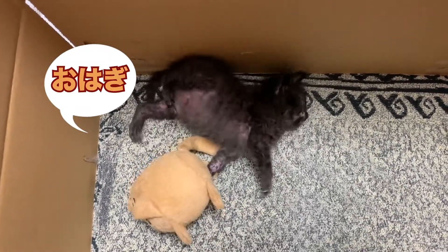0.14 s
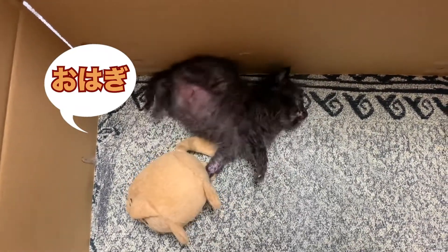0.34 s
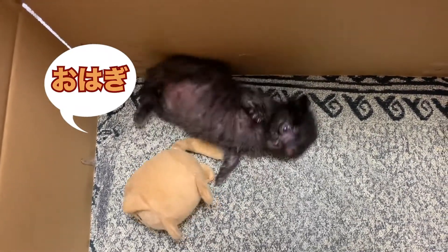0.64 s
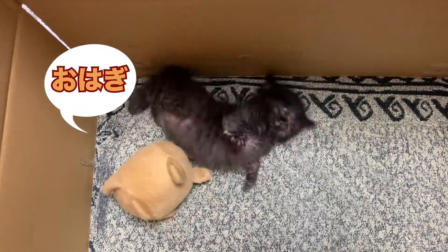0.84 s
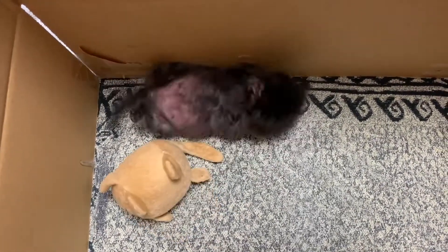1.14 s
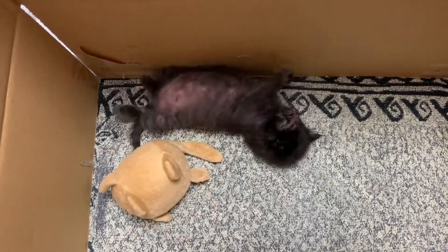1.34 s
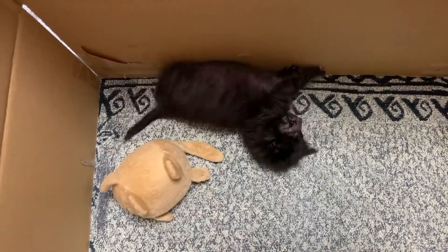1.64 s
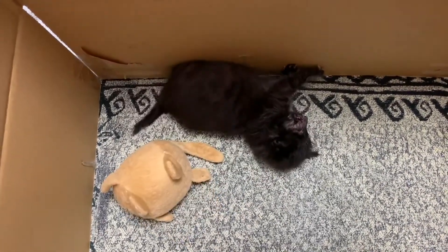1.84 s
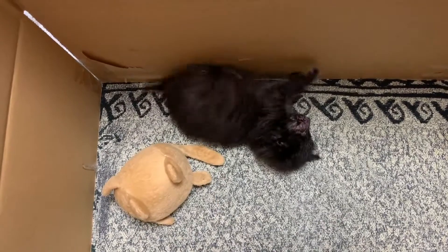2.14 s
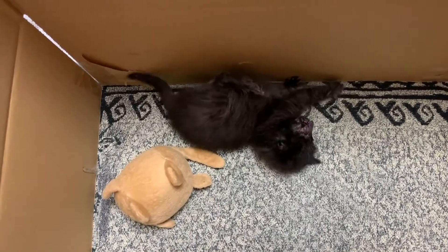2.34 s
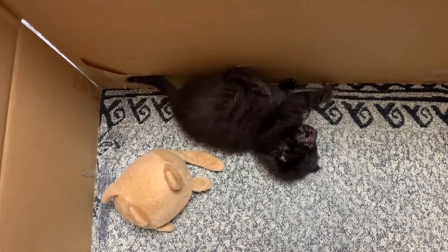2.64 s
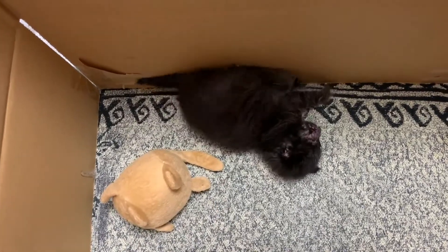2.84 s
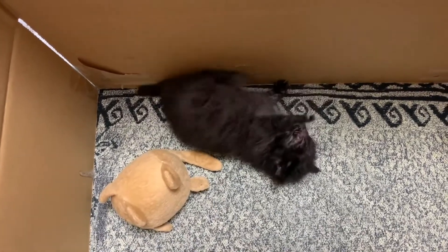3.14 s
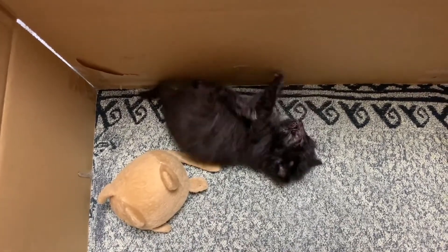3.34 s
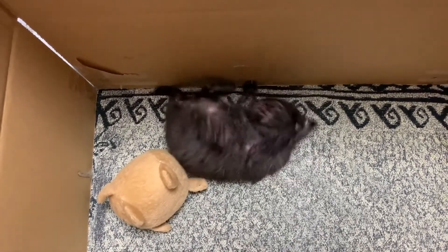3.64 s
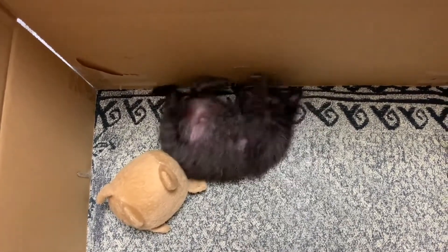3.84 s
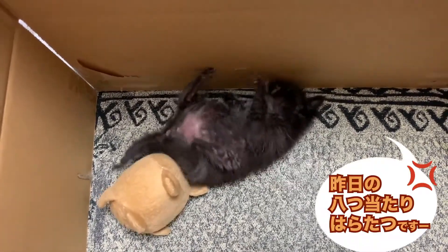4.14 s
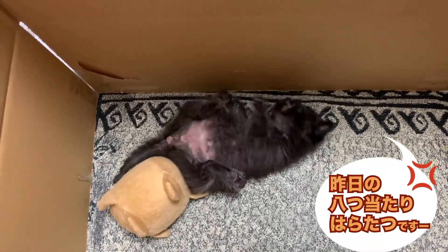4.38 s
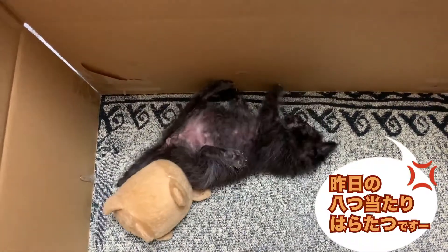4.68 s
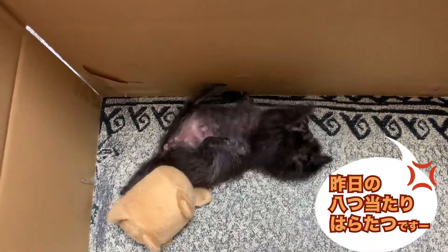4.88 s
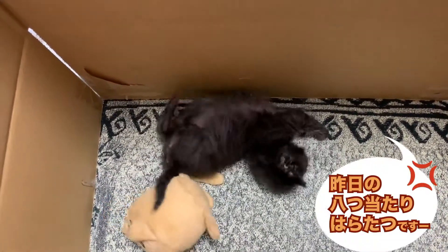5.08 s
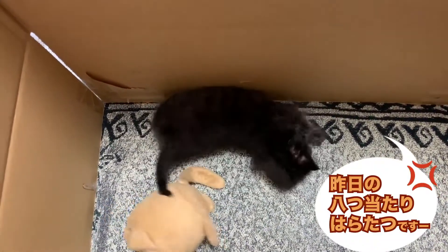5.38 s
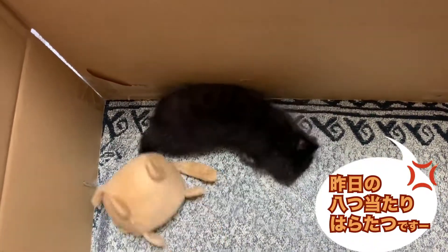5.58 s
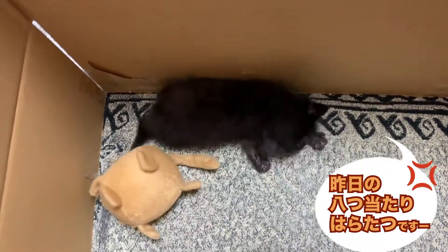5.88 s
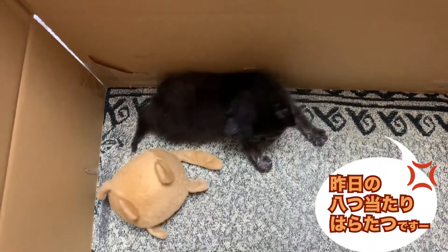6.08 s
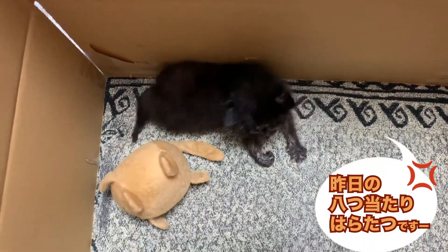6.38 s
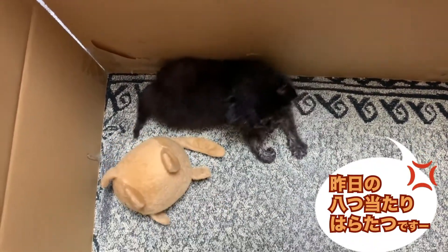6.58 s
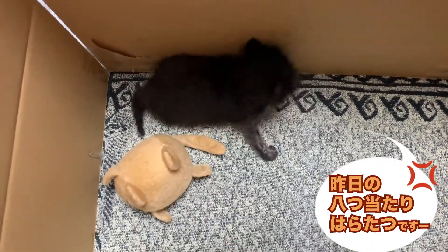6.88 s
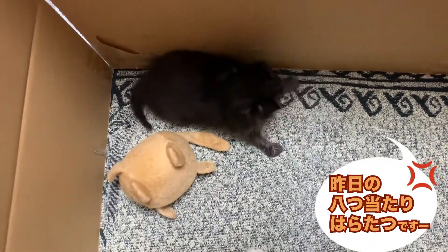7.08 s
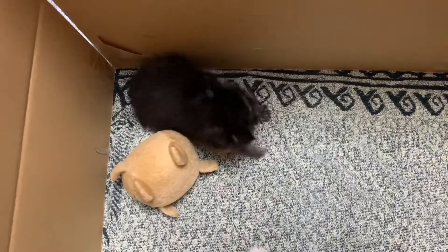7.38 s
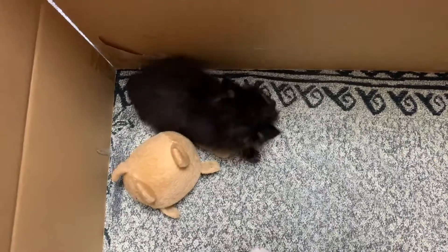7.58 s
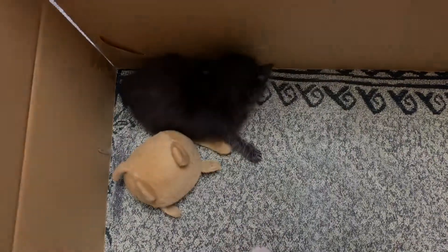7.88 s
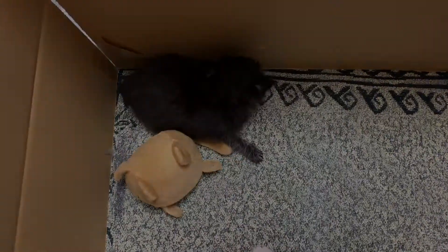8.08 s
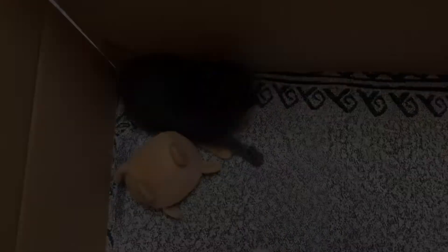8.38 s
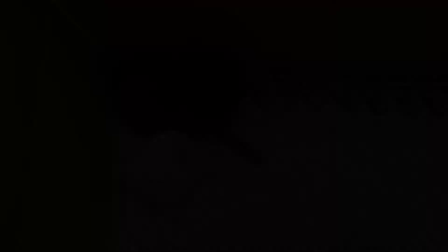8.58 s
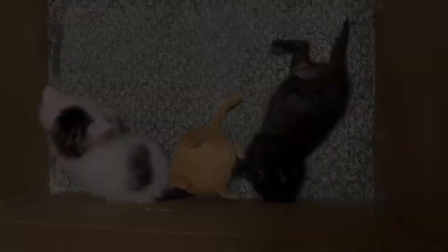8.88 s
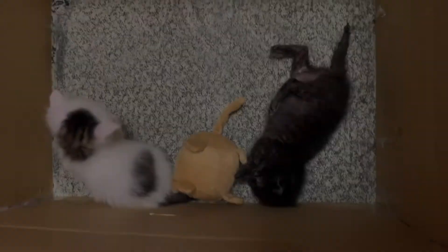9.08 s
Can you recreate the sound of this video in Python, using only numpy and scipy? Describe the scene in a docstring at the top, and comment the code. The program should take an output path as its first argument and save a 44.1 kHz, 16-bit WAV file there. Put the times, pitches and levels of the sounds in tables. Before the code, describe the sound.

Close, soft rustling and scratching come in fits as a kitten wriggles on carpet in a cardboard box. Dull knocks on the wall mix with quick paw swipes and crisp claw clicks. Past the middle, a brief hard clatter and a dull shuffle come from beside the box, and the floor thumps softly. Only light rubs and taps follow, with a low indoor hum underneath.

```python
"""A kitten rolls about on a carpet mat in a big cardboard box, heard from just above.
Its fur brushes the mat, its paws scrape and knock the cardboard and make it ring,
and its claws catch and snap free. Rubbing sounds are made of many tiny slips.
Soft thumps shake the floor, something clacks and shuffles outside the box, and the quiet room hums."""
import sys
import numpy as np
from scipy import signal
from scipy.fft import rfft, irfft
from scipy.io import wavfile
from scipy.ndimage import uniform_filter1d, map_coordinates

SR = 44100
rng = np.random.default_rng(int(sys.argv[2]) if len(sys.argv) > 2 else 0)


def dump_mix(stems):
    """Bounce the given channels to the path in sys.argv[1] as a 16-bit WAV at rate SR."""
    frames = np.atleast_2d(stems).T  # one column per channel
    limited = np.clip(frames, -1, 1)  # hard clip at full scale
    pcm = np.round(limited * 32767).astype(np.int16)
    wavfile.write(sys.argv[1], SR, pcm)


N = 406643
TIME = np.arange(N) / SR
HIT = TIME[:SR // 2]  # half a second, the clock for one short sound


def amp(db):
    """Turn decibels into a factor to multiply by."""
    return 10 ** (np.asarray(db) / 20)


def unit(x):
    """Scale a sound to an average (rms) strength of 1."""
    return x / np.sqrt(np.mean(x ** 2))


def energy(x, db, span_s=0.013):
    """Give a short sound the energy of a level held for span_s."""
    return x * amp(db) * np.sqrt(span_s * SR / np.sum(x ** 2))


def add(track, s, sound):
    """Mix a sound into the track, starting at s seconds."""
    start = int(s * SR)
    track[start:start + len(sound)] += sound[:max(N - start, 0)]


def fade(seconds):
    """A curve that dies away by 60 dB in the given time."""
    return np.exp(-np.log(1000) * HIT / max(seconds, 1e-3))


def swell(s, length):
    """Speed of a stroke around time s: it gathers pace, holds and stops short."""
    along = 2 * (TIME - s) / length
    steepness = np.where(along < 0, 1, along ** 2)
    return np.exp(-np.minimum(along ** 2 * steepness, 50))


def walk(rate):
    """A random curve that drifts about 1 either way and turns about `rate` times a second."""
    step = int(SR / rate)
    return 1.8 * uniform_filter1d(np.repeat(rng.standard_normal(N // step + 1), step), step)[:N]


def grains(share, spread_db, size):
    """Tiny slips of uneven strength, on a given share of all samples."""
    direction, strength = rng.standard_normal((2, size))
    return (rng.random(size) < share) * np.sign(direction) * amp(spread_db * np.clip(strength, -2, 2))


def cut(x, order, hz, kind):
    """Keep the lows, the highs or a band; a higher order cuts more steeply."""
    return signal.sosfilt(signal.butter(order, hz, kind, fs=SR, output="sos"), x)


def colour(x, points, size=8192):
    """Shape the tone of a sound along a curve of (Hz, dB) points."""
    hz, db = np.transpose(points)
    log_hz = np.log(np.fft.rfftfreq(size, 1 / SR) + 1)
    log_gain = np.log(amp(np.interp(log_hz, np.log(hz), db)))
    # build the filter so that nothing sounds before its cause
    cepstrum = irfft(log_gain)[:size // 2]
    cepstrum[1:] *= 2
    response = irfft(np.exp(rfft(cepstrum, size)))
    return signal.fftconvolve(x, response)[:len(x)]


def ring(x, modes, scatter_db=0):
    """Make an object ring at its own notes (modes); a wider note dies sooner."""
    shares = amp(scatter_db * rng.standard_normal(len(modes)))  # vary with the spot touched
    response = sum(share * amp(db) * width * np.exp(-np.pi * width * HIT) * np.sin(2 * np.pi * hz * HIT)
                   for share, (hz, width, db) in zip(shares, modes))
    return signal.fftconvolve(x, response * 2 * np.pi / SR)[:len(x)]


def room_hum(level_db=-51, waver_db=0.9):
    """The house rumbles alike on both sides, under a faint hiss that differs left and right."""
    # Each row: frequency in Hz, relative level in dB.
    room_tone = [(20, -12.5), (40, 0.5), (70, -3), (96, 4), (125, -4.5), (200, -16), (320, -18), (520, -23),
                 (760, -37.5), (1500, -33.5), (4000, -46.5), (8000, -41.5), (16000, -59.5)]
    rumble, hiss = (unit(colour(rng.standard_normal(N), room_tone)) for _ in range(2))
    hiss = cut(hiss, 1, 2000, "highpass")
    return amp(level_db) * (rumble * amp(waver_db * walk(1.8)) + np.array([hiss, -hiss]))


def wriggling(rise_s=0.04, settle_s=0.04, twitch_db=2.3, twitches_per_s=26):
    """How hard the body rubs mat and wall: each bout sets in, twitches and dies away."""
    # Each row: start and end in seconds, relative level on the mat and on the wall in dB.
    bouts = [(0.083, 0.177, -68, -66.5), (0.453, 0.874, -73, -69.5), (1.091, 1.312, -61, -61),
             (1.49, 1.733, -59.5, -54), (1.8, 2, -69, -66.5), (2.01, 2.274, -58.5, -61),
             (2.32, 2.703, -74.5, -66.5), (2.787, 3.138, -74, -62), (3.452, 3.61, -64, -62),
             (3.697, 4.155, -65, -61), (4.558, 5.087, -65, -59.5), (5.181, 5.487, -65.5, -61.5),
             (6.282, 6.414, -71, -62.5), (6.834, 7.12, -60.5, -61), (8.405, 8.646, -72.5, -71.5)]
    effort = np.zeros((2, N))
    for start, end, mat_db, wall_db in bouts:
        rest = np.maximum((start - TIME) / rise_s, (TIME - end) / settle_s)
        moving = np.exp(-np.clip(rest, 0, 20))
        effort = np.maximum(effort, np.outer(amp([mat_db, wall_db]), moving))
    return effort * amp(twitch_db * walk(twitches_per_s))


def swiping(effort):
    """Add quick paw swipes to the wriggling, giving the rubbing speed on mat and cardboard."""
    # Each row: middle and length in seconds, relative level on the mat and on the cardboard in dB.
    swipes = [(1.577, 0.061, -50, -36), (1.766, 0.069, -42.5, -50), (1.802, 0.047, -49.5, -39.5),
              (1.891, 0.039, -57, -36.5), (2.057, 0.081, -47, -36), (2.142, 0.12, -56.5, -40.5),
              (2.949, 0.15, -58.5, -57), (3.125, 0.11, -55.5, -56.5), (3.402, 0.044, -49, -46),
              (3.572, 0.081, -54.5, -63), (3.69, 0.028, -49.5, -63), (3.959, 0.071, -34, -54),
              (4.099, 0.074, -39.5, -40.5), (4.197, 0.044, -48.5, -57), (4.717, 0.026, -42, -35),
              (4.771, 0.031, -46, -53.5), (4.818, 0.095, -52.5, -52), (5.022, 0.13, -48.5, -80),
              (5.329, 0.041, -49.5, -61), (7.252, 0.11, -56.5, -57), (7.887, 0.075, -64.5, -64),
              (8.039, 0.075, -69.5, -66), (8.24, 0.05, -69, -66.5), (8.484, 0.04, -65, -54.5)]
    power = effort ** 2
    for s, length, mat_db, card_db in swipes:
        power += np.outer(amp([mat_db, card_db]), swell(s, length)) ** 2
    return np.sqrt(power)


def roaming(x, patchy_db, spots_per_s=14):
    """A paw moves from spot to spot, so each narrow band of pitch swells and sinks on its own."""
    hz, s, cells = signal.stft(x, SR, nperseg=512)
    spots = rng.standard_normal((64, 512))
    place = np.meshgrid(6 * np.log2(1 + hz / 200), s * spots_per_s, indexing="ij")
    gain = amp(patchy_db * map_coordinates(spots, place, order=1, mode="mirror"))
    return signal.istft(cells * gain, SR)[1][:N]


def brushing(speed, mat_db=6.5, fur_db=-12.5, flutter_db=2):
    """Countless carpet fibres flick past, and fine hairs whisper along with them."""
    # Each row, in both tables: frequency in Hz, relative level in dB.
    mat_tone = [(100, -18.5), (400, -12.5), (800, -24), (1500, -13.5), (3500, -2.5), (5300, -4), (6700, 6),
                (8500, 1.5), (10500, 0), (14000, -12.5), (16000, -23.5)]
    fur_tone = [(5000, -36.5), (11000, -16), (13300, 2.5), (16000, 0), (17000, -30)]
    hiss = colour(grains(.05, 5, N), mat_tone) * amp(flutter_db * walk(60))
    mat = unit(roaming(hiss, patchy_db=3.4)) * speed * amp(mat_db)
    touch = speed ** .75  # hairs sound at the lightest touch and grow less with force
    fur = unit(colour(rng.standard_normal(N), fur_tone)) * touch * amp(fur_db)
    return mat + fur


def wander(x, depth=0.06, rate=9):
    """The pitch drifts up and down as a paw moves along the wall."""
    position = np.arange(N) + np.cumsum(depth * walk(rate))
    return map_coordinates(x, [position], order=1, mode="mirror")


def cardboard(x, scatter_db=0, stretch=1):
    """A small touch rings the cardboard with little bass; stretch scales its pitch."""
    # Each row: pitch in Hz, width in Hz, relative level in dB.
    high_modes = [(940, 70, -11), (1165, 55, 2), (1340, 70, 2), (1625, 75, 2), (1795, 80, -2),
                  (1960, 150, -4), (2350, 130, -6), (2530, 110, -8), (2890, 200, -11), (3400, 400, -11.5),
                  (3950, 500, -16)]
    modes = [(hz * stretch, width, db) for hz, width, db in high_modes]
    return cut(ring(x, modes, scatter_db), 4, 1080, "highpass")


def dragging(speed, rub_db=-4, ring_db=-8, hollow_db=-2, judder_db=2):
    """Paw pads stick and slip: a dry rub, the ring of the cardboard and the hollow box."""
    # Each row: frequency in Hz, relative level in dB.
    rub_tone = [(100, -9.5), (330, 10.5), (570, 6.5), (740, -1), (1000, -12), (1300, 2), (2200, -3),
                (3000, -15.5), (4200, -3.5), (8000, -29), (16000, -52.5)]
    # The hollow notes of the box. Each row: pitch in Hz, width in Hz, relative level in dB.
    box_modes = [(400, 180, -3), (574, 60, 3), (865, 110, -9), (1170, 60, 2), (1980, 250, -5)]
    slips = grains(.05, 4.5, N) * amp(judder_db * walk(90))
    hollow = amp(hollow_db) * unit(cut(wander(ring(slips, box_modes)), 2, 300, "highpass"))
    rub = amp(rub_db) * unit(colour(slips, rub_tone))
    ringing = amp(ring_db) * unit(cardboard(slips))
    return roaming(rub + ringing + hollow, patchy_db=4) * speed


def snagging(speed, hz, db, octaves=0.5, cycles=14, spread_db=4, count=3500):
    """Single fibres snag on a claw and flick free, each with its own pitch and strength."""
    out = np.zeros(N)
    starts = rng.uniform(0, TIME[-1], count)
    chances = np.clip(rng.standard_normal((count, 2)), -2, 2)
    for s, (pitch, size) in zip(starts, chances):
        turns = hz * 2 ** (octaves * pitch) * HIT[:512]
        decay = np.exp(-np.log(1000) * turns / cycles)
        add(out, s, amp(spread_db * size) * np.sin(2 * np.pi * turns) * decay)
    return unit(out) * speed * amp(db)


def zipping():
    """A claw runs over the threads of the mat with a pitched rasp."""
    # Each row: middle and length in seconds, relative level in dB, pitch and width in Hz.
    zips = [(0.427, 0.03, -58.5, 920, 200), (1.777, 0.03, -35.5, 4280, 1500),
            (3.683, 0.049, -40, 4400, 1415), (3.954, 0.15, -46.5, 3460, 800),
            (4.709, 0.032, -32.5, 3800, 1200), (5.327, 0.035, -44, 8050, 400),
            (5.682, 0.023, -37, 4650, 600), (8.923, 0.37, -68, 990, 160)]
    out = np.zeros(N)
    for s, length, db, hz, width in zips:
        rasp = unit(ring(grains(0.032, 1.9, len(HIT)), [(hz, width, 0)]))
        speed = np.exp(-(2 * (HIT - HIT.mean()) / length) ** 2)
        add(out, s - HIT.mean(), rasp * speed * amp(db))
    return out


def blows(rows, modes, boost_db, chatter, chatter_s):
    """Padded pushes ring a surface, each with a faint chatter as the body settles."""
    out = np.zeros(N)
    for s, db, hz in rows:
        force = chatter * unit(grains(.05, 3.0, len(HIT))) * fade(chatter_s)
        force[0] += 1  # the push itself
        padded = cut(force, 1, [hz / 1.4, hz * 1.35], "bandpass")
        blow = ring(padded, modes)
        add(out, s, blow * amp(db + boost_db) / np.abs(blow).max())
    return out


def bending(x, lag_s, at_hz=100, lead_hz=4000):
    """High waves cross cardboard faster, so a blow sinks in pitch; at_hz takes about lag_s."""
    hz = np.fft.rfftfreq(2 * N, 1 / SR)
    turns = lag_s * np.sqrt(at_hz) * (2 * np.sqrt(hz) - hz / np.sqrt(lead_hz))
    return irfft(rfft(x, 2 * N) * np.exp(-2j * np.pi * turns))[:N]


def knocking(follow_s=0.0215, follow_db=-14, follow_pitch=0.6, pad_hz=900):
    """Soft blows run through the wall; the body follows each one, later, softer and lower."""
    # Each row: start in seconds, relative level in dB, middle frequency of the push in Hz.
    knocks = [(1.1225, -22.5, 180), (1.184, -26, 297), (2.223, -22.5, 212), (3.04, -34.5, 143),
              (3.372, -22.5, 607), (3.386, -33.5, 149), (4.693, -16.5, 348), (4.726, -31.5, 300),
              (4.799, -37.5, 277), (5.681, -41, 260), (5.773, -44, 200), (6.013, -35, 232),
              (6.815, -32.5, 404), (6.838, -32, 228), (7.854, -34, 380), (9.202, -31, 150)]
    # The notes of the bending wall. Each row: pitch in Hz, width in Hz, relative level in dB.
    wall_modes = [(122, 26, -4), (183, 30, -1), (290, 30, -4), (320, 380, 0), (400, 80, -7), (560, 60, -2)]
    follows = [(s + follow_s, db + follow_db, hz * follow_pitch) for s, db, hz in knocks]
    wall = blows(knocks + follows, wall_modes, boost_db=7.5, chatter=0.039, chatter_s=0.11)
    return bending(cut(wall, 2, pad_hz, "lowpass"), lag_s=0.012)


def ticking(boost_db=2, fade_s=0.018, breadth=0.3, upper_db=-8):
    """A claw tip taps and skips on a small patch of cardboard that barely rings."""
    # Each row: start in seconds, relative level in dB, pitch of the spot in Hz.
    ticks = [(1.1235, -51, 1270), (2.382, -56.5, 1930), (2.514, -56.5, 2500), (2.558, -48.5, 3050),
             (2.93, -52.5, 7500), (4.564, -60, 3400), (4.855, -43, 7000), (5.077, -47.5, 7500),
             (8.408, -53.5, 450), (8.852, -63, 1310)]
    out = np.zeros(N)
    for s, db, hz in ticks:
        slips = grains(.25, 4, len(HIT)) * fade(fade_s)
        slips[0] += 2  # the first tap
        modes = [(hz, hz * breadth, 0), (hz * 1.3, hz * breadth, upper_db)]
        add(out, s, energy(ring(slips, modes), db + boost_db))
    return out


def clawing(ring_boost_db=5, snap_boost_db=3.5, lead_in_db=-25, lead_in_s=0.032):
    """A faint hiss swells just before each claw snaps, then a short run of smaller slips follows."""
    # Each row: time in seconds, relative level of the ring and of the snap in dB, fade in seconds.
    claws = [(1.1804, -24, -26.5, 0.027), (1.551, -45, -38.5, 0.1), (2.224, -39.5, -47.5, 0.0094),
             (2.2633, -58, -44, 0.024), (3.046, -54.5, -68, 0.009), (3.372, -34, -35.5, 0.06),
             (4.073, -45, -37, 0.051), (4.49, -47, -52.5, 0.064), (4.564, -60.5, -50, 0.056),
             (4.6932, -31.5, -30, 0.11), (5.397, -53.5, -42.5, 0.064), (5.526, -52, -45, 0.12),
             (5.678, -49, -30, 0.014), (5.9693, -58, -39.5, 0.0071), (6.013, -31, -26, 0.017),
             (6.128, -51.5, -40, 0.021), (6.817, -55.5, -38.5, 0.064), (6.907, -50, -40.5, 0.12),
             (7.8526, -49.5, -39, 0.032)]
    # Each row: frequency in Hz, relative level in dB.
    snap_tone = [(300, -30.5), (1000, -10), (2200, 1), (4500, 9), (7500, 8), (10500, 2), (14500, -2)]
    out = np.zeros(N)
    for s, ring_db, snap_db, fade_s in claws:
        loudness = np.concatenate([amp(lead_in_db) * fade(lead_in_s)[::-1], fade(fade_s)])
        slips = grains(0.28, 8.0, len(loudness)) * loudness
        slips[len(HIT)] += 1.4  # the snap itself
        ringing = cardboard(slips, scatter_db=1.8, stretch=1 + .015 * rng.standard_normal())
        snap = energy(colour(slips, snap_tone), snap_db + snap_boost_db)
        add(out, s - len(HIT) / SR, energy(ringing, ring_db + ring_boost_db) + snap)
    return bending(out, lag_s=0.004)


def thumping():
    """Weight lands and shakes the floor under the box."""
    # Each row: start in seconds, relative level in dB, middle frequency of the push in Hz.
    landings = [(1.184, -31.5, 112.3), (2.85, -35, 85), (2.94, -34, 61), (3.385, -40, 35.6),
                (4.699, -38.5, 55), (5.38, -40, 42.6), (6.902, -20, 48.7), (7.855, -41, 50.3)]
    # The deep notes of the floor. Each row: pitch in Hz, width in Hz, relative level in dB.
    floor_modes = [(27.23, 2.7, 12), (53, 7, -10.5), (66, 17, -1.5), (104.6, 4.8, -8), (160, 38, -13)]
    return blows(landings, floor_modes, boost_db=7, chatter=0.012, chatter_s=0.67)


def shuffling(level_db=-1, scuff_db=2):
    """Something slides outside the box in dull, uneven strokes; the last, at 7.29 s, is the kitten's body
    rolling over."""
    # Each row: middle and length in seconds, relative level in dB.
    shuffles = [(6.446, 0.4, -50.5), (6.705, 0.16, -42), (6.91, 0.068, -41), (7.291, 0.37, -54)]
    # Each row: frequency in Hz, relative level in dB.
    shuffle_tone = [(60, 5), (150, 2), (300, 6.5), (550, -3.5), (950, -8.5), (1400, -10), (2200, -15.5),
                    (5000, -15), (12000, -30)]
    speed = sum(amp(db) * swell(s, length) for s, length, db in shuffles)
    rub = unit(colour(grains(.05, 4.3, N), shuffle_tone))
    return rub * speed * amp(level_db + scuff_db * walk(35))


def clacking(level_db=-10, fade_s=0.027, breadth=0.34, upper_db=-5):
    """Something hard clacks outside the box: a brief rattle rings two notes and a bright crack."""
    # Each row: start in seconds, relative level in dB, lower and upper note in Hz.
    clacks = [(6.355, -27.5, 1250, 1720), (6.412, -24, 1210, 2640), (6.418, -26.5, 1160, 1710),
              (6.428, -34.5, 1120, 1700), (6.451, -18, 900, 2270), (6.467, -22.5, 1670, 3550),
              (6.602, -30.5, 920, 3000)]
    # The crack all clacks share. Each row: pitch in Hz, width in Hz, relative level in dB.
    crack_modes = [(4000, 5100, -14.5), (7290, 3300, -12.5), (14000, 1620, -35)]
    out = np.zeros(N)
    for s, db, low_hz, high_hz in clacks:
        rattle = grains(.4, 2.9, len(HIT)) * fade(fade_s)
        notes = [(low_hz, low_hz * breadth, 0), (high_hz, high_hz * breadth, upper_db)]
        clack = cut(ring(rattle, notes + crack_modes), 2, low_hz / 2, "highpass")
        add(out, s, energy(clack, db + level_db))
    return out


def reverb(x, db, fade_s, dull_hz):
    """Many echoes blur into a tail whose bass is alike left and right."""
    common, apart = rng.standard_normal((2, len(HIT)))
    apart = cut(apart, 2, 350, "highpass")
    onset = 1 - np.exp(-HIT / 0.0005)
    tails = np.array([common + apart, common - apart]) * fade(fade_s) * onset
    tails = cut(tails, 1, dull_hz, "lowpass")
    return amp(db) * np.array([signal.fftconvolve(x, tail / np.linalg.norm(tail))[:N] for tail in tails])


def stereo(x):
    """Sound reaches the two openings of the microphone out of step."""
    # Each row: frequency in Hz, lead of the left side over the right in radians.
    leads = [(0, 0), (560, .15), (760, 1.7), (1100, .35), (2400, .4), (3900, 1.2), (5300, 3.1),
             (14200, 12.2)]
    lead = np.interp(np.fft.rfftfreq(2 * N, 1 / SR), *np.transpose(leads))
    return irfft(rfft(x, 2 * N) * np.exp(.5j * np.array([lead, -lead])))[:, :N]


def scene():
    """The kitten in its box, the noises beside it and the room around both."""
    on_mat, on_card = swiping(wriggling())
    thumps = thumping()
    snags = snagging(on_mat, hz=4000, db=-6) + snagging(on_card, hz=2200, db=-5)
    scratches = brushing(on_mat) + dragging(on_card) + snags + zipping() + clawing() + ticking()
    kitten = scratches + knocking()
    outside = shuffling() + clacking()
    box_echo = reverb(scratches, db=-10, fade_s=0.067, dull_hz=4670)
    room_echo = reverb(kitten, db=-22.5, fade_s=0.27, dull_hz=8000)
    room_echo += reverb(outside, db=-10, fade_s=0.1, dull_hz=3770)
    return stereo(kitten + thumps + outside) + box_echo + room_echo + room_hum()


def record(dry):
    """Turn the sound down, let it drop out briefly and return a bit quieter, and cut the very top."""
    gain_db, top_hz = -7.5, 16300
    gap_start_s, gap_end_s, ramp_s = 8.66, 8.72, 0.008
    gap_db, after_db = -52, -0.5
    corners = [gap_start_s, gap_start_s + ramp_s, gap_end_s - ramp_s, gap_end_s]
    gap = amp(np.interp(TIME, corners, [0, gap_db, gap_db, after_db]))
    top_cut = signal.ellip(8, .2, 70, top_hz, fs=SR, output="sos")
    return signal.sosfilt(top_cut, dry * amp(gain_db) * gap)


dry = scene()
out = record(dry)
dump_mix(out)
```